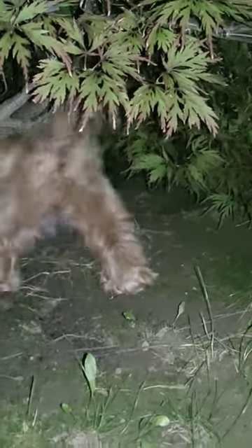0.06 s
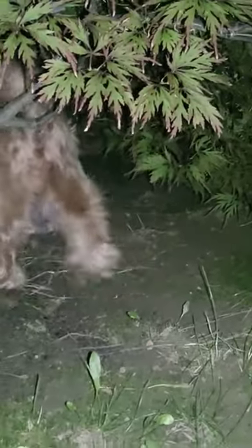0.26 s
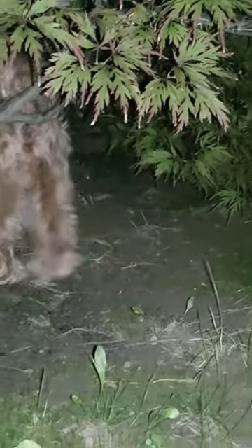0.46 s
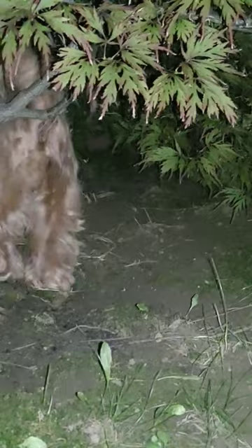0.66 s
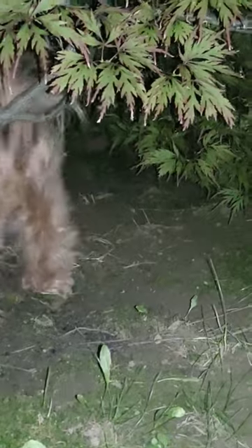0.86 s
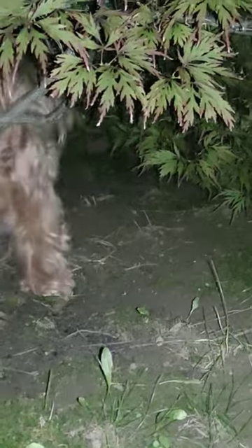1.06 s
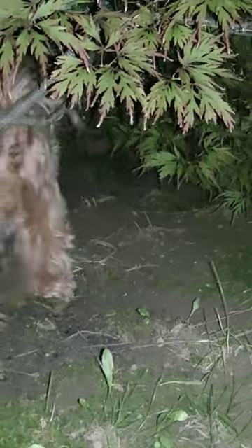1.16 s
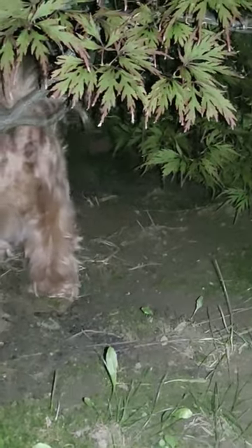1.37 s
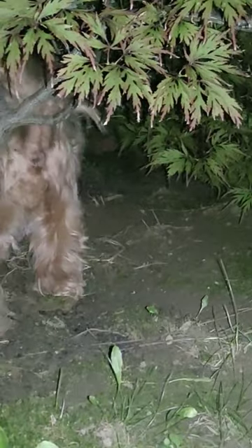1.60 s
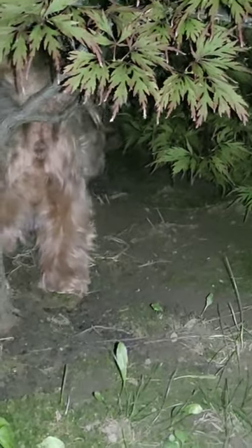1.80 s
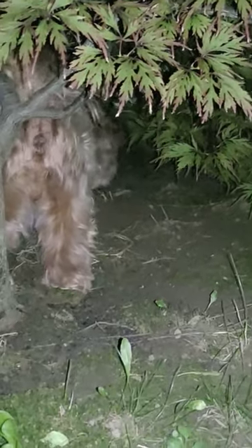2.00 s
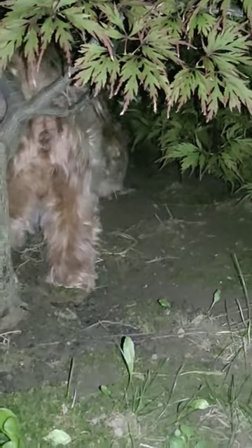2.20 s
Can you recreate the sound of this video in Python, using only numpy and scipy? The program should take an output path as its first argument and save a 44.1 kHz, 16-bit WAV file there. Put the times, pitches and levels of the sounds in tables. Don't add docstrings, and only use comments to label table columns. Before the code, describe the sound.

A small dog barks twice in a quiet night garden. Faint paw crackles in leaves come from 0.16 to 0.7 s, with a soft stir near 0.95 s. The first bark at 1.0 s lasts about 0.2 s, rough at the start, arching high, sagging into a grunt. A slightly higher, clipped bark follows at 1.67 s. Short echoes trail; a twig stirs at 2.14 s. A cricket and distant traffic continue throughout.

```python
import sys
import numpy as np
from scipy import signal
from scipy.fft import rfft, irfft
from scipy.io import wavfile
from scipy.ndimage import uniform_filter1d

SR = 44100
rng = np.random.default_rng(int(sys.argv[2]) if len(sys.argv) > 2 else 0)


def boost_factor(decibels):
    exponent = np.asarray(decibels, float) / 20
    return 10 ** exponent


def master_out(mix):
    frames = np.transpose(np.atleast_2d(mix))
    ceiling = np.clip(frames, -1, 1)
    pcm = np.round(ceiling * 32767).astype(np.int16)
    wavfile.write(sys.argv[1], SR, pcm)


N = 99092

# [t/s, pitch f/Hz, first partial level/dB, effort level/dB,
# half-rate share level/dB]
FOLDS_FIRST = [
    (1.0, 409.3, -47.5, -50.5, 9.5),
    (1.022, 543.4, -33, -36, 0),
    (1.05, 689.8, -27.5, -31, -10),
    (1.08, 755.9, -23, -34.5, -22.5),
    (1.14, 738.6, -20.5, -31, -27.5),
    (1.168, 636.3, -28.5, -34.5, -29.5),
    (1.196, 391.4, -36.5, -58, -18.5),
    (1.205, 190.8, -45.5, -60, -25),
    (1.3, 152.4, -52.5, -63.5, -16),
]
FOLDS_SECOND = [
    (1.672, 443.1, -43.5, -55, -12.5),
    (1.702, 591.6, -30.5, -34, -1),
    (1.724, 636, -33.5, -33.5, -25.5),
    (1.778, 774.3, -22.5, -30.5, -13),
    (1.802, 864, -17.5, -35.5, -45.5),
    (1.82, 865, -15, -45, -42.5),
    (1.83, 755.4, -31.5, -45.5, -33),
    (1.868, 451.4, -49.5, -60, -12.5),
    (1.885, 300, -58, -60, -24),
]
# [t/s, pitch f/Hz, level/dB, roughness 0-1]
RING_FIRST = [
    (1.001, 1142, -46, .9),
    (1.01, 1089, -18, .6),
    (1.037, 1244, -14.5, .25),
    (1.048, 1133, -11.5, 0.2),
    (1.078, 1060, -14.5, .15),
    (1.095, 1028, -28.5, .4),
    (1.142, 1100, -27, 0.1),
    (1.154, 889, -19.5, .3),
    (1.211, 931.4, -35.5, 0.5),
]
RING_SECOND = [
    (1.67, 914.5, -58, .9),
    (1.68, 1000, -32, 1),
    (1.698, 1124, -15, 0.4),
    (1.707, 1223, -21.5, 0.33),
    (1.72, 1094, -12, .05),
    (1.759, 1067, -21, .1),
    (1.777, 1052, -14, 0.099),
    (1.786, 1042, -31, .7),
    (1.81, 1036, -38.5, 0.49),
]
# [start t/s, length t/s, start f/Hz, end f/Hz, level/dB]
GRUNTS = [
    (1.2, 0.117, 210, 120, -40.5),
    (1.875, 0.044, 165, 131, -52.5),
    (1.855, 0.03, 430, 390, -45),
    (1.865, 0.026, 290, 255, -52.5),
]
# [f/Hz, width f/Hz, level/dB]
MOUTH = [(1140, 280, 4.5), (1580, 45, -1), (1914, 88, 6.5), (2656, 470, -3.5), (3320, 414, -5.5),
         (3930, 360, -12.5), (4480, 200, -11.5), (5500, 1200, -19.5), (7500, 1800, -23.5),
         (11600, 1300, -39.5)]
OVERTONES_DB = [7, 0, -5, -10, -14, -22]
# [f/Hz, level/dB]
TILT_FIRST = [(200, 0.3), (900, 1.1), (2300, 0), (4300, -5), (8000, 11), (14000, -2.6)]
TILT_SECOND = [(200, -1), (900, 0.7), (2300, 2.5), (4300, -9.5), (8000, 6), (14000, 0.5)]
# [t/s, left level/dB, right level/dB]
ECHOES = [
    (.0031, -21.5, -33),
    (.0074, -23, -32),
    (.013, -15, -24),
    (.036, -17, -18),
    (.078, -23, -23.5),
]
# [t/s, level/dB]
WALLS = [
    (.19, -53),
    (0.294, -52),
]
# [f/Hz, 60 dB decay t/s]
YARD_T60 = [(200, 0.067), (800, 0.28), (2500, 0.5), (6000, .3), (12000, 0.17)]
# [t/s, level/dB, centre f/Hz, width f/Hz, 60 dB decay t/s]
RUSTLES = [
    (.16, -69, 6000, 2030, 0.046),
    (0.213, -62.5, 3560, 706, 0.15),
    (0.216, -56.5, 1480, 700, 0.042),
    (0.289, -75.5, 3150, 413, 0.51),
    (0.443, -63, 6240, 4000, 0.04),
    (0.52, -88, 9000, 6000, 0.033),
    (.64, -77, 5870, 2980, 0.27),
    (0.693, -65.5, 4970, 4000, 0.099),
    (0.952, -64, 1306, 948, 1),
    (2.141, -57, 1377, 132.8, 0.065),
]
# [offset t/s, length t/s, left level/dB, right level/dB]
SYLLABLES = [
    (0, 0.02, -68, -78),
    (0.018, 0.037, -68.5, -74.5),
    (0.044, 0.027, -72, -83),
]
# [f/Hz, width f/Hz, level/dB]
WING = [(8960, 420, -1.5), (9480, 1200, -1), (9930, 1400, 2.5), (11600, 800, -15.5)]
# [f/Hz, level/dB]
NIGHT = [(15, -60.5), (25, -40), (50, -8.5), (70, -5.5), (133, -13), (306, -18), (362, -24.5), (438, -23),
         (7500, -48), (9750, -70), (16500, -120)]
# [f/Hz, correlation 0-1]
LIKENESS = [(60, 0.88), (180, 0.94), (540, 0.027), (1630, 0.081), (4900, 0.092), (14700, 0.07)]

PARTIALS_DB, BREATH_DB, LOW_BREATH_DB = -6.5, 1, -21.5
JITTER_FIRST, JITTER_SECOND, RING_JITTER = .005, .014, .009
CLEAR_FIRST_DB, CLEAR_SECOND_DB = 0, -7
LOCK_DB, LOCK_SHARPNESS, THIRD_DB = -15.5, 14, 7
CHEST_HZ, CHEST_DB = 650, 1
GROWL_HZ, GROWL_JITTER, GROWL_BREATH_DB = 300, .13, 13
ONSET_BREATH_DB, SHIMMER_DB, HALF_SHIMMER_DB = 14, 1.3, 2.5
AIR_HZ, AIR_WIDTH_HZ, AIR_DB, AIR_SHARPNESS = 12800, 1800, -36, 9
RING_WIDTH_HZ, RING_WOBBLE_DB, SIDEBAND_DB = 140, .8, -19
GRUNT_WOBBLE_DB, GRUNT_JITTER = 2, .09
MOUTH_SHIFT, MOUTH_PATCHY_DB = .08, 1.8
NOTCH_HZ, NOTCH_WIDTH_HZ, NOTCH_DEPTH = 5950, 560, .98
NOTCH_DELAY_FIRST_S, NOTCH_DELAY_SECOND_S, NOTCH_RISE_S = .06, .015, .035
LEAD_FIRST_S, LEAD_SECOND_S = 6e-5, 3e-5
LEAVES_DB, LEAVES_HZ, LEAVES_T60_S, SWAY_PER_S = 1, 1500, .04, 4
DOG_LOW_HZ = 120
YARD_DB, FAR_DB, FAR_DECAY_SCALE_S, WALL_SMEAR_S = -19, -51, 1.3, .035
CHIRP_START_S, CHIRP_PERIOD_S, TEETH_PER_S, WING_SPREAD = .002, .1025, 400, 1.15
NIGHT_DB, HISS_DB = -57.5, -74.5
HUM_HZ, HUM_WANDER, HUM_WOBBLE_DB, HUM_DB = 68.5, .05, 2.5, -59
LOW_EDGE_HZ, TOP_EDGE_HZ = 45, 15250


def evened(x):
    return x / np.sqrt(np.mean(x ** 2) + 1e-20)


def read(points, hz):
    f, value = np.transpose(points)
    return np.interp(np.log(hz + 1), np.log(f + 1), value)


def resonate(x, hz, width):
    turn = np.exp(2j * np.pi * np.cumsum(hz * np.ones(len(x))) / SR)
    r = np.exp(-np.pi * width / SR)
    return 2 * (turn * signal.lfilter([1 - r], [1, -r], x / turn + 1e-18)).real


def resonate_twice(x, hz, width):
    return resonate(resonate(x, hz, width), hz, width)


def drift(size):
    return evened(uniform_filter1d(uniform_filter1d(rng.standard_normal(N), size), size))


def controls(table):
    t, cols = np.arange(N) / SR, np.transpose(table)
    opens = (t - cols[0][0] + .002) / .006
    closes = (cols[0][-1] + .03 - t) / .05
    gate = np.clip(np.minimum(opens, closes), 0, 1)
    return gate, [uniform_filter1d(np.interp(t, cols[0], c), size=150) for c in cols[1:]]


def bark(folds, ring, jitter, clear_db, notch_delay_s):
    gate, (hz, level_db, effort_db, half_db) = controls(folds)
    slack = 1 / (1 + (hz / GROWL_HZ) ** 6)
    wander = jitter * drift(size=60) + GROWL_JITTER * slack * drift(size=120)
    turns = np.cumsum(hz * (1 + wander)) / SR
    puffs = (0.36 + np.exp(-(turns / 2 % 1) / 0.13)) * rng.standard_normal(N)
    low = chest(turns, hz, half_db, slack, puffs)
    upper = boost_factor(effort_db) * throat(turns, hz, half_db, clear_db, puffs)
    upper = side_pocket(upper, folds[0][0] + notch_delay_s)
    return gate * (np.sqrt(2) * boost_factor(level_db) * low + upper) + mouth_song(ring, turns, puffs)


def chest(turns, hz, half_db, slack, puffs):
    half = boost_factor(np.minimum(half_db, 0))
    first = boost_factor(SHIMMER_DB * drift(size=200)) * np.cos(2 * np.pi * turns)
    doubled = 0.49 * half ** 1.3 * boost_factor(HALF_SHIMMER_DB * drift(size=250)) * np.cos(np.pi * turns)
    third = boost_factor(THIRD_DB) * half * np.cos(3 * np.pi * turns)
    partials = 0
    for k in range(2, 6):
        level = boost_factor(3.5 * drift(size=200)) / (1 + (k * hz / CHEST_HZ) ** 6) / k
        partials = partials + level * np.cos(2 * np.pi * k * turns)
    breath_db = LOW_BREATH_DB + GROWL_BREATH_DB * slack + ONSET_BREATH_DB * half
    breath = boost_factor(breath_db) * evened(resonate(resonate(puffs, hz, 170), hz, 240))
    return first + doubled + third + boost_factor(CHEST_DB) * partials + breath


def throat(turns, hz, half_db, clear_db, puffs):
    opening = hz / hz.max()
    half = boost_factor(np.minimum(half_db, 0))
    pulses = half * sum(np.cos(np.pi * k * turns) for k in range(4, 18))
    voiced = mouth(boost_factor(PARTIALS_DB) * pulses + boost_factor(BREATH_DB + 13.5) * puffs, opening)
    locked = boost_factor(clear_db) / (1 + boost_factor(2 * (half_db - LOCK_DB))) * opening ** LOCK_SHARPNESS
    clear = 0
    for k, db in enumerate(OVERTONES_DB, 2):
        clear = clear + boost_factor(db + SHIMMER_DB * 2 * drift(size=400)) * np.cos(2 * np.pi * k * turns)
    hiss = evened(resonate_twice(puffs, AIR_HZ, AIR_WIDTH_HZ))
    return voiced + locked * clear + boost_factor(AIR_DB) * opening ** AIR_SHARPNESS * hiss


def mouth(x, opening):
    out, scale = 0, 1 + MOUTH_SHIFT * (opening - .85)
    for k, (f, width, db) in enumerate(MOUTH):
        level = (-1) ** k * boost_factor(db + MOUTH_PATCHY_DB * drift(size=350))
        out = out + level * resonate_twice(x, f * scale, width * 1.87)
    return out


def side_pocket(x, opens_s):
    pocket = NOTCH_DEPTH * np.clip((np.arange(N) / SR - opens_s) / NOTCH_RISE_S, 0, 1)
    for _ in range(3):
        x = x - pocket * resonate(x, NOTCH_HZ, NOTCH_WIDTH_HZ)
    return x


def mouth_song(ring, turns, puffs):
    on, (hz, db, rough) = controls(ring)
    rough = np.clip(rough, 0, 1)
    phase = 2 * np.pi * np.cumsum(hz * (1 + RING_JITTER * drift(size=60))) / SR
    sidebands = np.cos(phase + 2 * np.pi * turns) + np.cos(phase + np.pi * turns)
    tone = np.cos(phase) + boost_factor(SIDEBAND_DB) * sidebands
    fuzz = evened(resonate_twice(puffs, hz, RING_WIDTH_HZ * 2))
    level = on * boost_factor(db + RING_WOBBLE_DB * drift(size=110))
    return level * ((1 - rough) * np.sqrt(2) * tone + rough * fuzz)


def grunt_tone(start, length, from_hz, to_hz, db):
    u = np.clip((np.arange(N) / SR - start) / length, 0, 1)
    hz = from_hz + (to_hz - from_hz) * u
    turns = np.cumsum(hz * (1 + GRUNT_JITTER * drift(size=200))) / SR
    swell = boost_factor(db + GRUNT_WOBBLE_DB * drift(size=250)) * np.sin(np.pi * u ** 0.53)
    return np.sqrt(2) * swell * np.cos(2 * np.pi * turns)


def placed(x, tilt, lead_s):
    hz, t = np.fft.rfftfreq(N, 1 / SR), np.arange(2000) / SR
    side = boost_factor(read(tilt, hz) / 2) * np.exp(1j * np.pi * hz * lead_s)
    sway, scatter = 2 * np.pi * SWAY_PER_S * np.arange(N) / SR, 0
    for window in (np.cos(sway), np.sin(sway)):
        leaves = rng.standard_normal((2, len(t))) * boost_factor(-60 * t / LEAVES_T60_S)
        scatter = scatter + rfft(x * window) * rfft(leaves / np.linalg.norm(leaves[0]), N)
    both = rfft(x) + boost_factor(LEAVES_DB) * scatter / (1 + (LEAVES_HZ / (hz + 1)) ** 4)
    both = both / (1 + (DOG_LOW_HZ / (hz + 1)) ** 6)
    return irfft(both * np.array([side, 1 / side]), N)


def yard(x):
    taps = np.zeros((2, SR))
    at = np.arange(300, SR - 20, 20) + rng.integers(0, 20, (2, (SR - 301) // 20))
    np.put_along_axis(taps, at, rng.choice([-1., 1.], at.shape), 1)
    hz, t, z = signal.stft(taps, SR, nperseg=256)
    near_decay = boost_factor(-60 * t / read(YARD_T60, hz)[:, None])
    far_decay = boost_factor(-60 * t / FAR_DECAY_SCALE_S * (9.0 + (hz[:, None] / 4000) ** 2))
    near = signal.istft(z * near_decay, SR, nperseg=256)[1][:, :SR]
    far = signal.istft(z * far_decay, SR, nperseg=256)[1][:, :SR]
    tail = boost_factor(YARD_DB) * near / np.linalg.norm(near[0]) + boost_factor(FAR_DB) * far / np.linalg.norm(far[0])
    for s, left_db, right_db in ECHOES:
        tail[:, round(s * SR)] += boost_factor([left_db, right_db])
    for s, db in WALLS:
        smear = taps * np.exp(-((np.arange(SR) / SR - s) / WALL_SMEAR_S) ** 2)
        tail += boost_factor(db) * smear / np.linalg.norm(smear[0])
    return signal.fftconvolve(x, tail, axes=1)[:, :N]


def paws():
    t, out = np.arange(N) / SR, np.zeros((2, N))
    for s, db, hz, width, t60 in RUSTLES:
        grit = rng.standard_normal((2, N)) * boost_factor(1.6 * drift(size=30))
        shape = np.clip((t - s) / 0.0092, 0, 1) * boost_factor(db - 60 * np.maximum(t - s, 0) / t60)
        out += shape * np.array([evened(resonate_twice(g + grit[0], hz, width)) for g in grit])
    return out


def cricket():
    t = (np.arange(N) / SR - CHIRP_START_S + .01) % CHIRP_PERIOD_S - .01
    out = []
    for ch in range(2):
        clicks = (rng.random(N) < TEETH_PER_S / SR) * rng.standard_normal(N)
        teeth = clicks + 0.18 * rng.standard_normal(N)
        wing = evened(sum(boost_factor(db) * resonate_twice(teeth, f, w * WING_SPREAD) for f, w, db in WING))
        stroke = boost_factor(-76.5)
        for row in SYLLABLES:
            u = np.clip((t - row[0]) / row[1], 0, 1)
            stroke = stroke + boost_factor(row[2 + ch]) * np.sin(np.pi * u ** .7)
        out.append(wing * stroke * boost_factor(.6 * drift(size=2000)))
    return np.array(out)


def night():
    frames, hz = N // 512 + 5, np.fft.rfftfreq(2048, 1 / SR)
    a, b, c, d, patches = rng.standard_normal((frames, 1025, 5)).T
    patches = evened(uniform_filter1d(uniform_filter1d(patches, size=20, axis=0), size=6, axis=1))
    same, left = np.clip(read(LIKENESS, hz), -1, 1)[:, None], a + 1j * b
    z = np.array([left, same * left + np.sqrt(1 - same ** 2) * (c + 1j * d)])
    z *= boost_factor(read(NIGHT, hz)[:, None] + 1.2 * patches)
    wash = boost_factor(NIGHT_DB) * evened(signal.istft(z, nperseg=2048, noverlap=1536)[1][:, :N])
    hum_turns = np.cumsum(HUM_HZ * (1 + HUM_WANDER * drift(size=1500))) / SR
    hum = np.sqrt(2) * boost_factor(HUM_WOBBLE_DB * drift(size=1500)) * np.cos(2 * np.pi * hum_turns)
    return wash + boost_factor(HUM_DB) * hum + boost_factor(HISS_DB) * rng.standard_normal((2, N))


def scene():
    first = bark(FOLDS_FIRST, RING_FIRST, JITTER_FIRST, CLEAR_FIRST_DB, NOTCH_DELAY_FIRST_S)
    first = first + grunt_tone(*GRUNTS[0])
    second = bark(FOLDS_SECOND, RING_SECOND, JITTER_SECOND, CLEAR_SECOND_DB, NOTCH_DELAY_SECOND_S)
    second = second + sum(grunt_tone(*row) for row in GRUNTS[1:])
    dog = placed(first, TILT_FIRST, LEAD_FIRST_S) + placed(second, TILT_SECOND, LEAD_SECOND_S)
    return dog + yard(dog) + paws() + cricket() + night()


def roll_off(x):
    return signal.sosfilt(signal.butter(12, 15300, fs=SR, output="sos"), x)


def record(dry):
    low_cut = signal.butter(4, LOW_EDGE_HZ, "high", fs=SR, output="sos")
    top_cut = signal.firwin(255, TOP_EDGE_HZ, fs=SR)[None]
    mix = signal.oaconvolve(signal.sosfilt(low_cut, dry), top_cut, "same")
    return roll_off(mix)


dry = scene()
out = record(dry)
master_out(out)
```